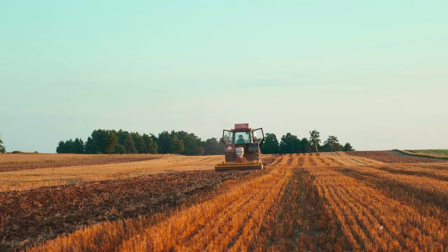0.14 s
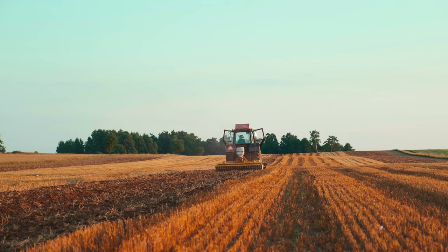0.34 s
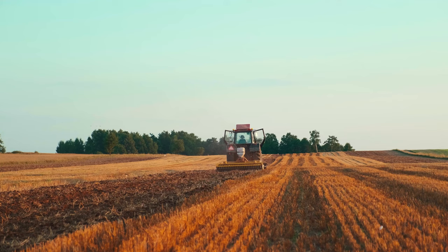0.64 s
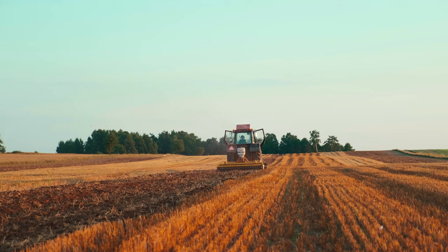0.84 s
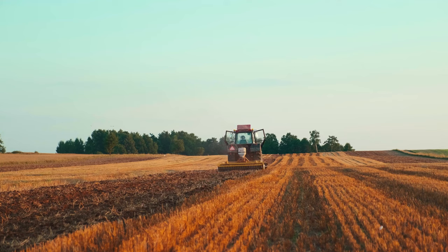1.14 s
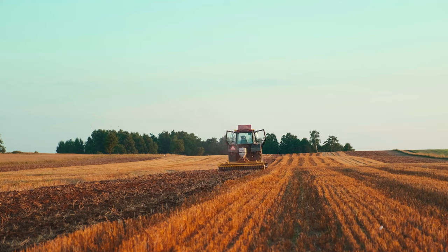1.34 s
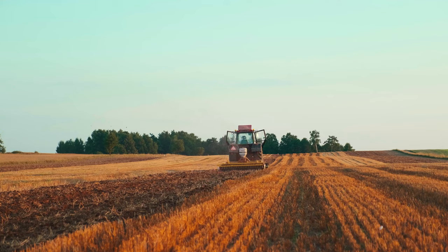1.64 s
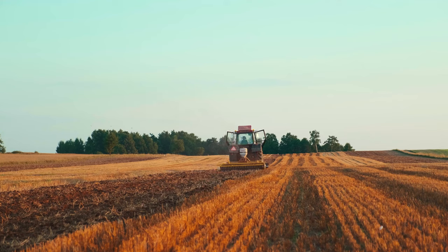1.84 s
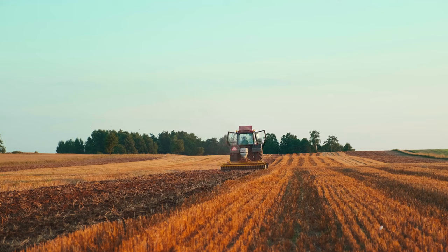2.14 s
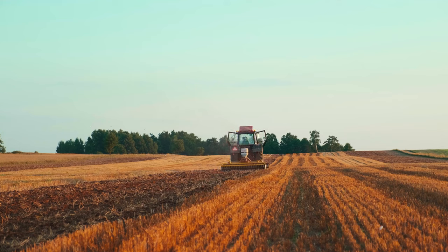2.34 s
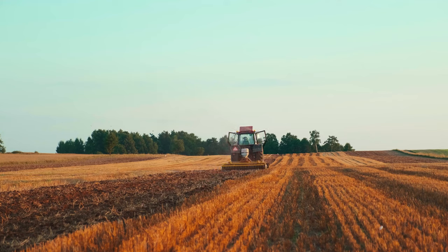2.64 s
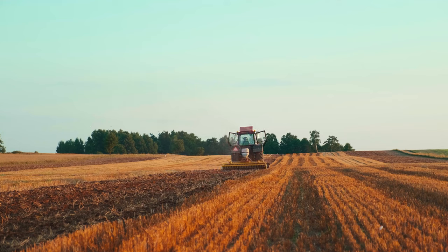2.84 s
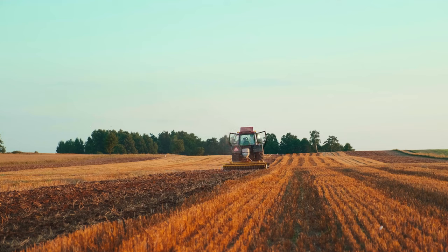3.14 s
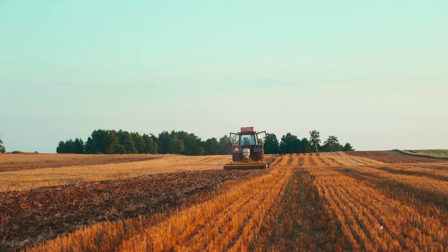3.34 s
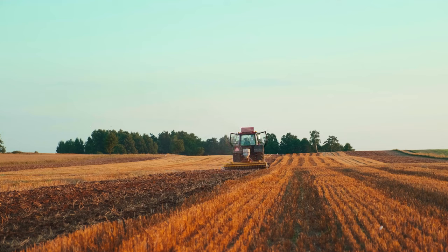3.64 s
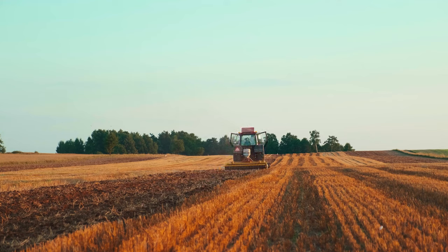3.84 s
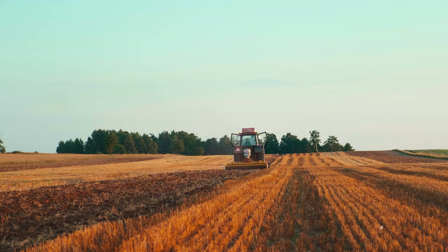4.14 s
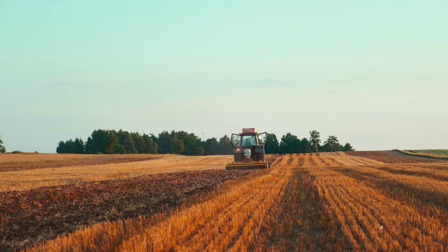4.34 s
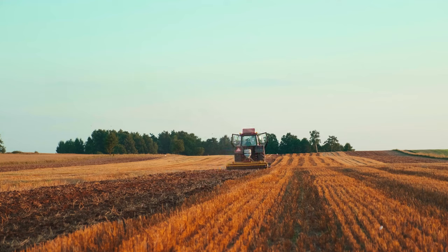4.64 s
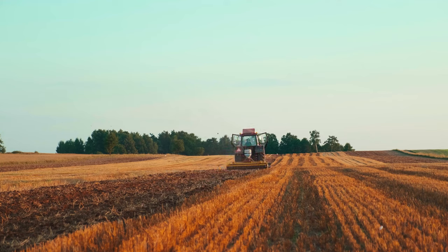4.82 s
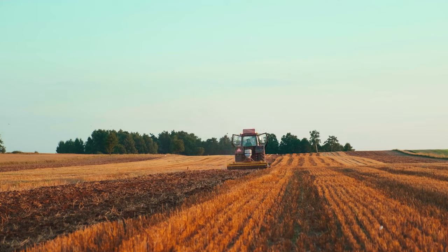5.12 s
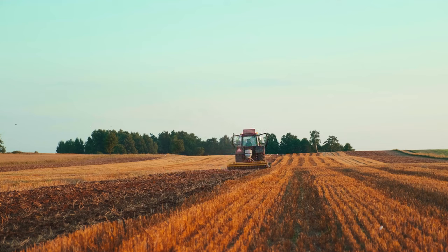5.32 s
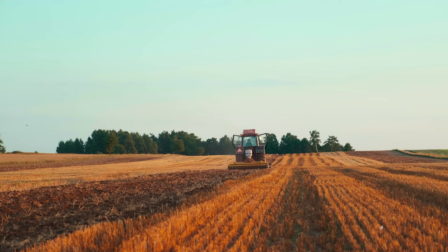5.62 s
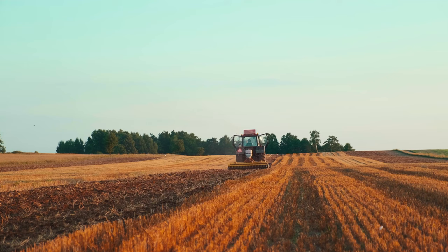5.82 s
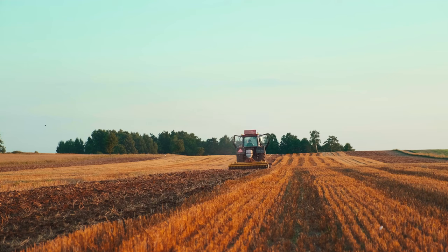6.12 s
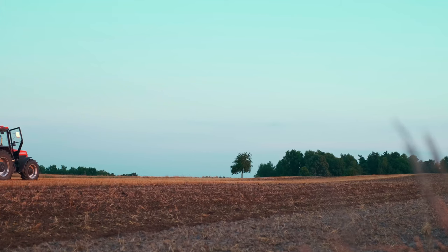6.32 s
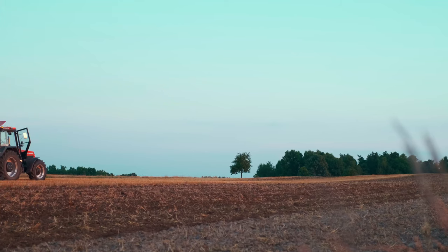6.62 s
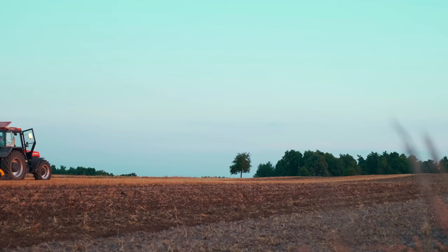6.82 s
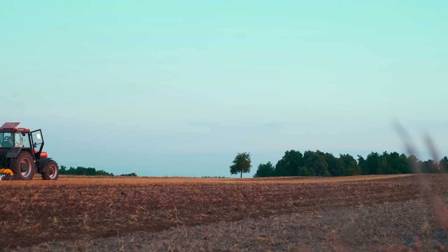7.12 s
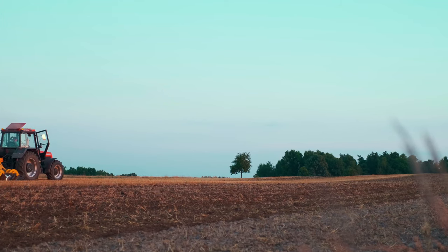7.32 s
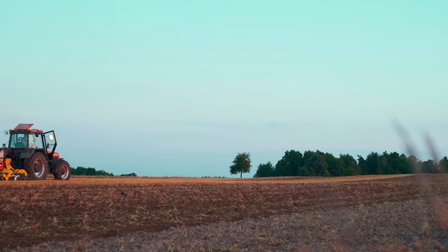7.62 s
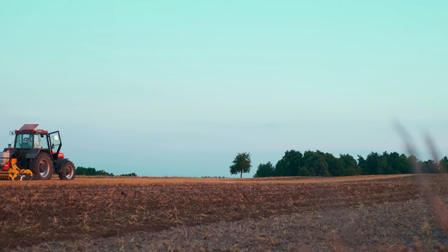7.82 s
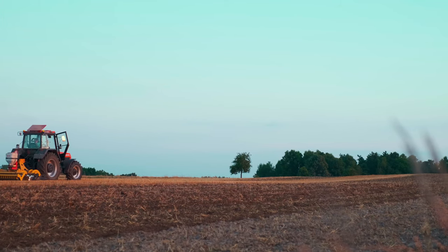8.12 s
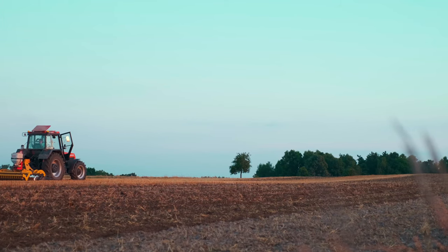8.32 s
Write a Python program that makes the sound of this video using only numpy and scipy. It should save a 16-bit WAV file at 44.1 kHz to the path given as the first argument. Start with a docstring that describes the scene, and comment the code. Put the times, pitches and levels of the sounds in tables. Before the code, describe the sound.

A six-cylinder diesel works under constant load outdoors, heard through a small stereo microphone with centred bass and slightly spread treble. First comes a smooth, boomy drone with rumble, rattling panels and occasional dull clicks of stones. Then, without a pause, the view jumps nearer and sideways: less pure boom, harsher clatter, clearer valve ticking, whirring fan and more stone knocks, continuing to the end.

```python
"""Diesel tractor on stubble

A six-cylinder diesel tractor pulls an implement over open stubble at steady revs, heard first from in front,
then at once from the side and nearer. Sines make the exhaust boom, engine and fan tones and a low hum.
Shaped noise makes the rumble, clatter, hiss, drifting bands and a brief rustle.
Ringing resonances make the valve ticks, the rattling tinware and the stones that clink in the implement."""
import sys
import numpy as np
from scipy import signal
from scipy.fft import rfft, irfft, next_fast_len
from scipy.io import wavfile

SR = 44100
rng = np.random.default_rng(int(sys.argv[2]) if len(sys.argv) > 2 else 0)


def pcm_store(signal):
    """Save signal as 16-bit PCM."""
    levels = np.round(np.clip(np.atleast_2d(signal), -1, 1) * 32767)
    wavfile.write(sys.argv[1], SR, levels.astype(np.int16).T)


N = 373527

# Tables and pairs of settings that come in two parts are for place 0 (front) and place 1 (side).


def from_db(db):
    """Turn a level in dB into a gain."""
    return 10 ** (np.asarray(db) / 20)


def rms_one(x):
    """Scale a sound to rms 1."""
    return x / np.sqrt(np.mean(x ** 2) + 1e-20)


def in_time(rows, span):
    """Read the columns of a time curve at every sample of a span."""
    s, *columns = np.transpose(rows)
    now = np.arange(N)[span] / SR
    return [np.interp(now, s, column) for column in columns]


def coloured(x, points, lead=0):
    """Filter x with a gain curve of (pitch_hz, gain_db) and a phase lead in radians at the same points."""
    size = next_fast_len(x.shape[-1])
    log_hz = np.log(np.arange(size // 2 + 1) * SR / size + 1)
    at_hz, gain_db = np.transpose(points)
    gain = from_db(np.interp(log_hz, np.log(at_hz), gain_db))
    phase = np.interp(log_hz, np.log(at_hz), lead + 0 * at_hz)
    return irfft(rfft(x, size) * gain * np.exp(1j * phase), size)[..., :x.shape[-1]]


def drift(rate, size):
    """Wander slowly by chance: random points of spread 1, rate of them per second, joined by lines."""
    points = rng.standard_normal(int(size / SR * rate) + 2)
    return np.interp(np.arange(size) / SR * rate, np.arange(len(points)), points)


def ring(clicks, hz, t60):
    """Ring a resonance: a unit click starts a sine of height about 1 that falls 60 dB in t60 seconds."""
    decay, turn = from_db(-60 / (t60 * SR)), 2 * np.pi * hz / SR
    # the tiny offset keeps the filter from slowing down in silence
    return signal.lfilter([0, np.sin(turn)], [1, -2 * decay * np.cos(turn), decay * decay], clicks + 1e-18)


def ring_twice(clicks, hz, t60):
    """Ring the same resonance twice, so that little is left away from its pitch."""
    return ring(ring(clicks, hz, t60), hz, t60)


# Engine speed at each place: start_s, firings_per_s
SPEED = [
    [(0, 80.57), (0.3, 81.31), (0.55, 80.13), (0.85, 81.1), (1.6, 80.59), (2.05, 81.21), (2.5, 80.74),
     (3.4, 80.87), (4.0, 81.04), (4.45, 81.49), (5.0, 81.19), (5.6, 81.39), (6.219, 81.3)],
    [(6.219, 81.93), (6.6, 82.08), (7.1, 81.6), (7.45, 81.9), (7.75, 81.59), (8.47, 82.5)],
]
# Part of a firing period already run when each place starts
START_TURNS = [.003, .591]
# Loudness at each place: start_s, clatter_db, hiss_db, rumble_db, boom_db, tinware_gain_db
LOUDNESS = [
    [(0, -30.5, -47.5, -34.5, -13.5, 2), (1.2, -32.5, -47, -35.5, -13, 4), (1.9, -32, -48.5, -37, -13, 2.5),
     (3.3, -31.5, -49.5, -37.5, -13, -1.5), (4.7, -31.5, -48.5, -35.5, -13.5, 0),
     (6.22, -32.5, -48.5, -37, -13, 0.5)],
    [(6.22, -25.5, -43.5, -33, -17, -1.5), (7, -26, -43.5, -32.5, -16.5, 4),
     (7.7, -26.5, -44.5, -31.5, -16.5, -6), (8.47, -26.5, -45, -31.5, -16, -3)],
]


def tractor(place, span, stones):
    """Add up the tractor and stones from one place; the running count of firings times the engine sounds."""
    firings_per_s, = in_time(SPEED[place], span)
    firings = np.cumsum(firings_per_s) / SR + START_TURNS[place] + 6  # one cycle ahead keeps counts positive
    clatter_db, hiss_db, rumble_db, boom_db, tinware_db = in_time(LOUDNESS[place], span)
    size = len(firings)

    low = exhaust_boom(firings, boom_db) + engine_tones(firings, place) + fan_tones(firings, place)
    low += rumble(rumble_db, place)
    if place == 0:
        low += hum(span)

    puff = knocking(firings - .58, depth_db=5.0, uneven_db=.6)
    gusts = from_db(hiss_db + 0.59 * drift(9, size))  # the treble flickers over the distance
    shared, apart = clatter(firings, clatter_db, place) + gusts * hiss(puff, place)
    high = shared + bands(place, span, puff) + valve(firings, *VALVE_TICK[place])
    high += from_db(tinware_db) * tinware(TINWARE[place], puff, per_s=110)
    high += stones[span]
    return low + ports(high, apart, place)


def exhaust_boom(firings, boom_db):
    """Sound one sine at the firing rate, wavering a little in level."""
    gain = np.sqrt(2) * from_db(boom_db + 0.14 * drift(5.9, len(firings)))
    return gain * np.cos(2 * np.pi * firings)


TONE_WAVER_DB = [2.4, .6]


def tones(table, turns, place):
    """Play sines on multiples of a turning rate, each wavering in level and phase."""
    size = len(turns)
    out = np.zeros(size)
    for multiple, *level_db in table:
        if level_db[place] > -70:  # -70 dB marks a tone not heard from this place
            gain = np.sqrt(2) * from_db(level_db[place] + TONE_WAVER_DB[place] * drift(8, size))
            phase_turns = multiple * turns + rng.random() + 0.047 * drift(6, size)
            out += gain * np.cos(2 * np.pi * phase_turns)
    return out


# Engine tones: multiple of the six-firing cycle, front_db, side_db; 50 to 200 are the timing gears meshing
ENGINE_TONES = [(4, -41, -48), (5, -45, -45), (7, -50, -70), (8, -52, -43), (9, -50, -52), (10, -48, -44),
                (12, -42, -46), (14, -53, -54), (16, -52, -70), (18, -48, -58), (31, -70, -51),
                (32, -70, -57), (45, -61, -52), (46, -70, -51), (48, -56, -54), (50, -56, -51),
                (51, -60, -70), (52, -59, -58), (54, -57, -55), (56, -58, -50), (58, -62, -49),
                (62, -70, -55), (100, -52, -63), (150, -52, -47), (200, -51, -70)]


def engine_tones(firings, place):
    """Hum on multiples of the engine cycle, which repeats every six firings."""
    return tones(ENGINE_TONES, firings / 6, place)


# Belt-driven fan: multiple of its turning rate, front_db, side_db
FAN_TONES = [(1, -70, -45), (4, -70, -45), (7, -53, -47), (8, -70, -32), (8.5, -70, -51), (9, -70, -42),
             (10, -46, -61), (11, -70, -51), (12, -64, -46), (12.5, -70, -47), (13, -70, -57),
             (21, -59, -52), (29, -70, -56), (30, -57, -51)]
FAN_TURNS_PER_FIRING = .3558


def fan_tones(firings, place):
    """Hum on multiples of the fan's turning rate; the belt ties it to the engine speed."""
    return tones(FAN_TONES, firings * FAN_TURNS_PER_FIRING, place)


# Exhaust and intake rumble, noise shape at each place: pitch_hz, gain_db
RUMBLE = [
    [(25, -32.5), (45, -3), (60, 9), (95, 6), (120, 1.5), (145, -4.5), (185, -2), (210, -5), (280, -2),
     (330, -8.5), (450, -18.5), (600, -46.5), (1200, -110)],
    [(25, -35), (45, -6), (65, 22.5), (115, 10.5), (150, 4), (195, 1.5), (235, -3), (295, -4), (325, 8),
     (360, 6), (390, -2), (425, 2.5), (520, -19), (1200, -110)],
]


def rumble(rumble_db, place):
    """Shape noise into the low roar of exhaust and intake, with a slowly wandering level."""
    size = len(rumble_db)
    roar = rms_one(coloured(rng.standard_normal(size), RUMBLE[place]))
    return from_db(rumble_db + 0.93 * drift(3.3, size)) * roar


def knocking(firings, depth_db, uneven_db):
    """Swell at each firing; every cylinder and every stroke has its own strength."""
    stroke = (firings + .5).astype(int)
    cylinder_db = depth_db * rng.normal(1, 0.2, 6)
    stroke_db = uneven_db * rng.standard_normal(stroke.max() + 1)
    swell = .5 + .5 * np.cos(2 * np.pi * firings)
    return from_db((cylinder_db[stroke % 6] + stroke_db[stroke]) * swell)


# Engine block clatter with the dips of the ground echo, noise shape at each place: pitch_hz, gain_db
CLATTER = [
    [(260, -49), (450, -29), (529, -18), (665, -10.5), (816, -11), (844, -11.5), (1100, -10.5),
     (1310, -6.5), (1470, -8), (1770, -4), (1940, -5.5), (2280, -3), (2460, -4.5), (2800, -6), (3430, -15),
     (4460, -28.5), (7550, -120)],
    [(260, -16), (450, -14), (543, -20.5), (611, -13.5), (858, -7), (983, -18), (1100, -4), (1380, -4),
     (1540, -7.5), (2030, -2.5), (2240, -9), (2530, -6.5), (2800, -13.5), (3100, -11.5), (3430, -15.5),
     (4460, -35.5), (7550, -120)],
]


def clatter(firings, clatter_db, place):
    """Swell noise with the firings and colour it like the engine block: a shared and an unlike part."""
    size = len(firings)
    knock = knocking(firings - .55, depth_db=0.5, uneven_db=0.93)
    noise = coloured(knock * rng.standard_normal((2, size)), CLATTER[place])
    return from_db(clatter_db + 0.57 * drift(14, size)) * rms_one(noise)


# Valve and injector hiss, noise shape at each place: pitch_hz, gain_db
HISS = [
    [(2500, -8.5), (3400, -11), (3700, -14), (4400, -7), (5150, -10.5), (5570, -11), (5900, -12),
     (6800, -17), (7300, -18.5), (8000, -19.5), (9000, -26), (11500, -33), (12500, -40), (15500, -47.5)],
    [(2800, -18), (3500, -18), (3900, -12.5), (4300, -6), (4600, -13), (4900, -5.5), (5200, -12.5),
     (5500, -10), (5900, -17.5), (6100, -15), (6450, -15), (9000, -29.5), (11000, -34.5), (15500, -52)],
]
# Where steady intake air takes over at each place: puffs_fade_from_hz, fade_to_hz, puffs_there_db
STEADY_AIR = [(7460, 9000, -5), (6040, 7500, -5.5)]


def hiss(puff, place):
    """Puff noise at each firing, giving way to steady air noise at the top: a shared and an unlike part."""
    from_hz, to_hz, puff_db = STEADY_AIR[place]
    puff_noise, air_noise = rng.standard_normal((2, 2, len(puff)))
    puffs = coloured(rms_one(puff) * puff_noise, [(from_hz, 0), (to_hz, puff_db)])
    air = coloured(air_noise, [(0.72 * from_hz, -30), (to_hz, -1)])
    return rms_one(coloured(puffs + air, HISS[place]))


# Rough bands that drift and fade as the tractor moves, at each place:
# width_hz, then rows of start_s, centre_hz, level_db (rms)
BANDS = [
    [(299.9, [(0, 2227, -49), (.25, 2240, -40), (.6, 2275, -35.5), (.72, 2276, -47), (.9, 2310, -38),
     (1.2, 2333, -40.5), (1.35, 2338, -48), (1.7, 2357, -54), (2.4, 2360, -47.5), (3.5, 2290, -52),
     (5.4, 2324, -48), (6.22, 2343, -51)]), (210.4, [(0, 1721, -43), (1, 1753, -42), (1.6, 1830, -40),
     (2.3, 1778, -45.5), (4, 1771, -50.5), (5.4, 1780, -43.5), (6.22, 1762, -45)]), (150, [(0, 2640, -58),
     (1.8, 2620, -51.5), (2.7, 2627, -47), (3.2, 2705, -44), (5.3, 2733, -42.5), (6.22, 2710, -51)]),
     (59.76, [(0, 2884, -51), (1.4, 2866, -45), (2.6, 2885, -54), (4, 2886, -47.5), (6.22, 2895, -51.5)]),
     (260, [(0, 5500, -65), (1.6, 5560, -61.5), (2.1, 5590, -72.5), (3, 5620, -63), (4.1, 5570, -64.5),
     (5.4, 5500, -57), (6.22, 5500, -62)]), (300, [(0, 4800, -70), (1.2, 4800, -64.5), (2.3, 4800, -73.5),
     (4.2, 4740, -66.5), (5.2, 4800, -55), (6.22, 4800, -63)]), (250.1, [(0, 680, -45), (.8, 691, -46.5),
     (1.6, 700.6, -55.5), (6.22, 697.4, -58.5)]), (300, [(0, 11440, -94), (4, 11400, -91.5),
     (4.9, 11400, -82), (5.4, 11400, -84), (6.22, 11400, -84)]), (199, [(0, 7940, -89), (4.5, 7850, -86),
     (5.2, 7850, -74), (6.22, 7850, -74)]), (198.7, [(0, 1150, -43), (.6, 1150, -50), (1.2, 1150, -60.5),
     (6.22, 1150, -61.5)]), (378.5, [(0, 7290, -84), (1.4, 7430, -79), (1.7, 7480, -71), (3, 7550, -69),
     (4, 7350, -68), (4.7, 7060, -67), (5.05, 7300, -61), (5.3, 7400, -66), (6.22, 7230, -70)])],
    [(100.1, [(6.22, 1400, -34.5), (7.2, 1393, -38.5), (7.7, 1376, -48), (8.47, 1390, -43)]),
     (109.7, [(6.22, 1198, -50), (7.2, 1169, -48.5), (7.9, 1197, -36), (8.47, 1154, -36.5)]),
     (217.5, [(6.22, 2000, -38), (6.8, 2039, -35), (7.4, 1950, -45), (8.47, 1847, -46)]),
     (254, [(6.22, 4860, -63), (7, 4880, -58), (7.6, 4920, -57), (8.47, 5000, -57)]),
     (120, [(6.22, 5980, -74), (7.1, 6040, -68), (8.47, 6200, -64)]), (119.5, [(6.22, 6800, -79),
     (7.3, 6820, -67), (8.47, 6850, -73)])],
]
BAND_FLICKER_DB = [3.2, 2.5]


def bands(place, span, puff):
    """Play narrow noise around each drifting centre, puffed by the firings and flickering."""
    out, size = 0, len(puff)
    for width_hz, rows in BANDS[place]:
        centre_hz, level_db = in_time(rows, span)
        angle = 2 * np.pi * np.cumsum(centre_hz) / SR
        # two quick random drifts spread the tone into a band
        noise = drift(width_hz, size) * np.cos(angle) + drift(width_hz, size) * np.sin(angle)
        flicker = from_db(BAND_FLICKER_DB[place] * drift(24, size))
        out = out + from_db(level_db) * rms_one(puff ** 1.3 * flicker * noise)
    return out


# Valve gear ticks at each place: pitch_hz, level_db (rms), t60_s, parts of the six-firing cycle run at the ticks
VALVE_TICK = [(5550, -71, .012, [.41, .91]), (4950, -55, .02, [.035, .9])]


def valve(firings, hz, level_db, t60, shares):
    """Send noise bursts of uneven strength, at fixed points of the cycle, through a narrow resonance."""
    cycles = firings / 6 - np.reshape(shares, (-1, 1))
    strength = from_db(3.5 * rng.standard_normal((len(shares), int(cycles.max()) + 1)))
    fade = np.exp(-(cycles % 1) / 0.047)  # 0.047 of a cycle
    beats = np.take_along_axis(strength, cycles.astype(int), axis=1) * fade
    bursts = beats.sum(axis=0) * rng.standard_normal(len(firings))
    return from_db(level_db) * rms_one(ring_twice(bursts, hz, t60))


# Loose tinware at each place: pitch_hz, level_db (rms, before the tinware gain), t60_s
TINWARE = [
    [(118.4, -50.5, 0.49), (1361, -52, 0.063)],
    [(120, -60, 0.52), (2380, -44.5, 0.028), (3236, -45, 0.012), (4390, -56.5, 0.044), (5500, -64, .02)],
]


def tinware(modes, shaken, per_s):
    """Ring loose panels that are tapped at random, more often on the firing strokes."""
    out, size = 0, len(shaken)
    for hz, level_db, t60 in modes:
        tapped = rng.random(size) < per_s * shaken ** 2 / SR
        taps = tapped * rng.standard_normal(size) * from_db(1.1 * drift(1.7, size))
        out = out + from_db(level_db) * rms_one(ring_twice(taps, hz, t60))
    return out


# Stones on the implement: start_s, strength_db, then bright_snap_db and ringing_db against the dull crack,
# and chatter_db
CLINKS = [(1.0012, -31, -6, -40, -30), (1.308, -29, -20, -32, 0), (1.5405, -29, -22, -32, -6),
          (1.8109, -37, -16, -32, 0), (1.9015, -29, -18, -32, 0), (4.2561, -48, 2, -32, -6),
          (4.5113, -33, -24, -38, 3), (4.5335, -35, -24, -38, 6), (4.5475, -36, -24, -36, 6),
          (6.4071, -29, -9, -28, -2), (6.4272, -33, -1, -20, -10), (6.4292, -15, -14, -29, -2),
          (6.4317, -19, -10, -28, -8), (6.7395, -27, -22, -34, 0), (6.8635, -34, -9, -30, 0),
          (6.9597, -30, -16, -32, 0), (7.0575, -33, -14, -28, 0), (7.1932, -24, -28, -36, -1)]
# Ringing of the implement: pitch_hz, level_db, t60_s
IMPLEMENT = [(3079, -5, .06), (3289, -6, .06), (3714, -5, .06), (4350, 0, .08), (5631, -18, .05),
             (9044, -15, .06), (9728, -24, .06), (11060, -26, .05)]


def clinks():
    """Each stone strikes once and chatters on: a dull crack, a bright snap and some ringing of the implement."""
    chatter = np.arange(int(0.03 * SR))
    size = len(chatter)
    knocked = np.zeros((3, N))  # blows that feed the crack, the snap and the ringing
    for s, strength_db, snap_db, ring_db, chatter_db in CLINKS:
        knocks = (rng.random(size) < .12) * rng.standard_normal(size) * np.exp(-chatter / (.008 * SR))
        knocks *= from_db(chatter_db) * (chatter > .001 * SR)  # chatter waits 1 ms
        knocks[0] = 3.6  # the main blow
        part_db = np.array([[0], [snap_db], [ring_db]])
        knocked[:, round(s * SR) + chatter] += from_db(strength_db + part_db) * knocks
    crack = coloured(knocked[0], [(1800, -8), (2900, 8), (3800, 15), (4700, 5), (6000, -9), (9000, -40)])
    snap = coloured(knocked[1], [(3500, -6), (5200, 16), (6500, 11), (8000, 2),
                                 (10500, -1), (13000, -9), (15500, -24)])
    ringing = sum(from_db(level_db) * ring(knocked[2], hz, t60) for hz, level_db, t60 in IMPLEMENT)
    return crack + snap + ringing


# Low hum that swells and sinks: top_s, level_db (rms at the top of that swell alone)
HUM = [(.31, -43), (.78, -42), (1.01, -37), (1.45, -37), (1.67, -40), (1.93, -38), (4.59, -42), (4.75, -43),
       (5.05, -38), (5.5, -39), (5.62, -44)]
HUM_HZ, HUM_SWELL_S = 184.5, .06


def hum(span):
    """Sound one soft sine under bell-shaped swells."""
    now = np.arange(N)[span] / SR
    swells = sum(from_db(level_db) * np.exp(-.5 * ((now - top_s) / HUM_SWELL_S) ** 2)
                 for top_s, level_db in HUM)
    return np.sqrt(2) * swells * np.cos(2 * np.pi * HUM_HZ * now)


RUSTLE_S, RUSTLE_HOLD_S, RUSTLE_DB = 0.054, .09, -55.5
RUSTLE_RISE_DB_PER_S, RUSTLE_FALL_DB_PER_S = 150, 68


def rustle():
    """Make a brief bright rustle close by: noise, partly unlike left and right, swells, holds, then dies."""
    late_s = np.arange(SR // 2) / SR - RUSTLE_S
    middle, side = rng.standard_normal((2, len(late_s)))
    noise = coloured(middle + .4 * side * np.array([[1], [-1]]),
                     [(3000, -28), (6000, -4), (10500, -12), (14000, -28)])
    rise_db = RUSTLE_RISE_DB_PER_S * late_s
    fall_db = np.minimum(0, RUSTLE_FALL_DB_PER_S * (RUSTLE_HOLD_S - late_s))
    return from_db(RUSTLE_DB + np.minimum(rise_db, fall_db)) * rms_one(noise)


# The two ports at each place: pitch_hz, left_over_right_db, left_leads_radians,
# unlike_part_db (gain on the unlike noise)
PORTS = [
    [(450, 0, 0, -38.5), (650, 0, 0.01, -28), (850, 0, -0.16, -14.5), (1000, -0.6, -0.3, -13),
     (1150, -2.5, -0.37, -9.5), (1300, -3, -0.27, -9.5), (1450, -2.5, -0.46, -9.5), (1650, -1, 0.07, -11.5),
     (1850, 2.5, -0.02, -12), (2040, -2, -0.7, -7), (2250, -2, 0.2, -10.5), (2450, 0, 0.08, -11.5),
     (2700, -1.5, -0.077, -12), (2950, -0.6, 0.32, -11), (3300, 0, 0.1, -11), (3700, 1, 0.23, -7),
     (4200, 2.5, 0.2, -8.5), (4800, 0.5, -0.09, -4.5), (5400, 3.5, 0.07, -6.5), (6200, 2, -0.06, -7),
     (7200, 2.0, -0.29, -5), (8500, 0, 0.16, -4.5), (10000, 2, 0.07, -5.5), (13000, 1.3, -0.1, -3.5)],
    [(450, 0, 0, -36), (650, -1, -1.3, -29), (850, -0.5, -0.7, -27), (1000, 2, 0.8, -16),
     (1150, 1.5, -0.0, -22), (1300, 0, 0.2, -26), (1450, -2, -0.1, -19), (1650, 2, 1, -16),
     (1850, 1.5, -1.1, -18), (2050, -2, 0.87, -22), (2250, -1, 0.5, -16), (2450, -2.5, 0.74, -18),
     (2700, -3, 1.1, -10), (2950, 1.5, 1.5, -10.5), (3270, 1.5, 1, -11), (3700, 4, 0.3, -13),
     (4200, 4.5, 1.2, -13), (4800, 1.5, 1.2, -12), (5400, 4, 1.3, -11), (6200, 0.5, 1.5, -12),
     (7200, 0, 1.6, -4.5), (8460, 4, 2.5, -4.5), (10000, 4, 1.5, -6), (13000, 3, 3.5, -1)],
]


def ports(x, apart, place):
    """Hear through two close ports: equal in the bass; higher up each colours and delays in its own way."""
    hz, tilt_db, lead, unlike_db = np.transpose([(300, 0, 0, -80), *PORTS[place]])
    unlike = coloured(apart, list(zip(hz, unlike_db)))
    left, right = [coloured(x + side * unlike, list(zip(hz, side * tilt_db / 2)), side * lead / 2)
                   for side in (1, -1)]
    return np.array([left, right])


SWITCH_S, BLEND_S = 6.219, .003


def scene():
    """Play the front place, then blend to the side place within a few milliseconds; a rustle starts it off."""
    switch, blend = round(SWITCH_S * SR), round(BLEND_S * SR)
    side_share = np.clip((np.arange(N) - switch) / blend, 0, 1)
    stones, near = clinks(), rustle()
    out = np.zeros((2, N))
    out[:, :near.shape[1]] += near
    front, side = slice(0, switch + blend), slice(switch, N)
    out[:, front] += (1 - side_share)[front] * tractor(0, front, stones)
    out[:, side] += side_share[side] * tractor(1, side, stones)
    return out


CUTOFF_HZ = 15700


def record(dry):
    """Cut the top with a steep low-pass filter."""
    return signal.sosfilt(signal.cheby2(20, 60, CUTOFF_HZ, fs=SR, output="sos"), dry)


dry = scene()
out = record(dry)
pcm_store(out)
```